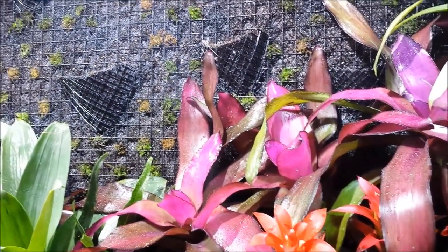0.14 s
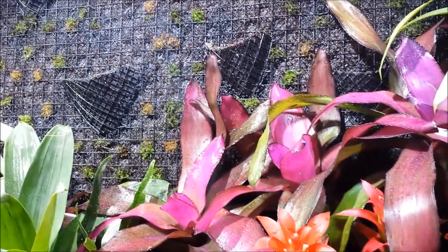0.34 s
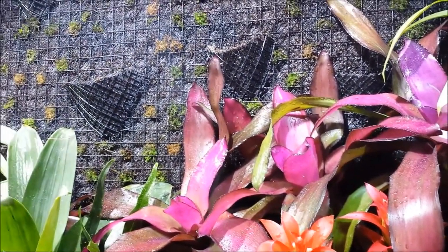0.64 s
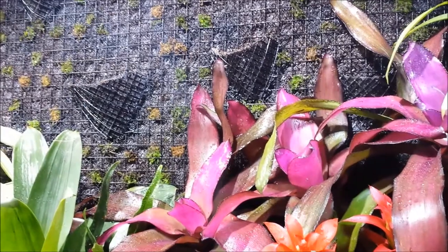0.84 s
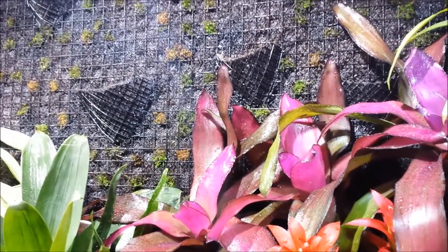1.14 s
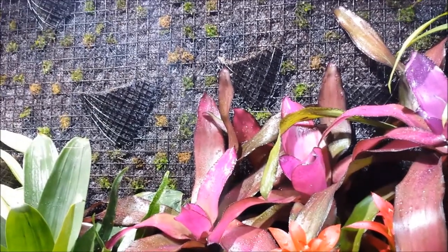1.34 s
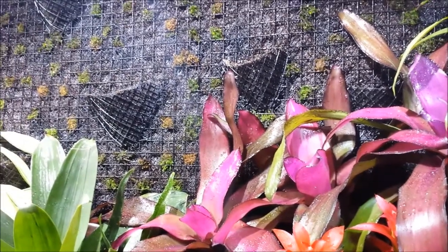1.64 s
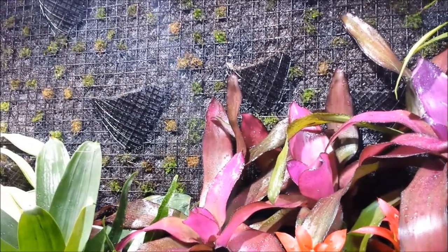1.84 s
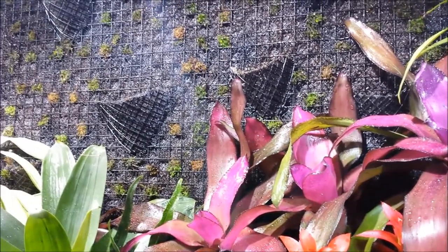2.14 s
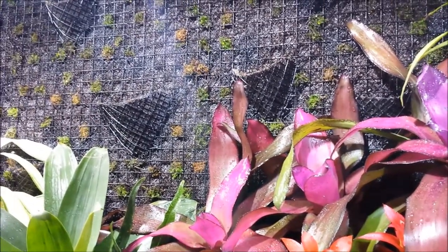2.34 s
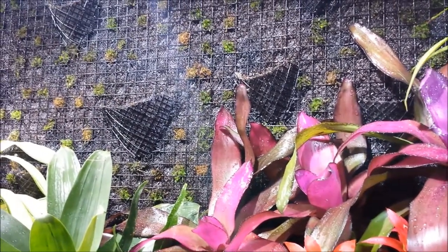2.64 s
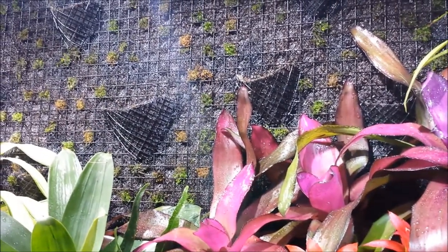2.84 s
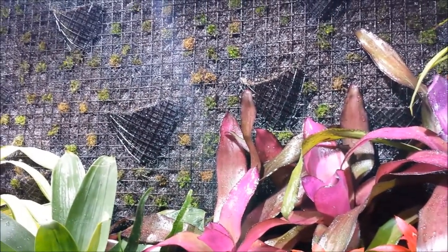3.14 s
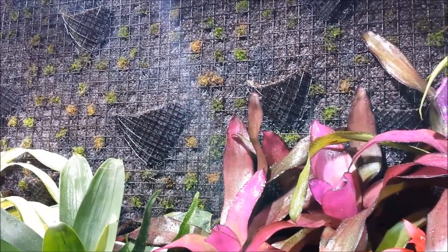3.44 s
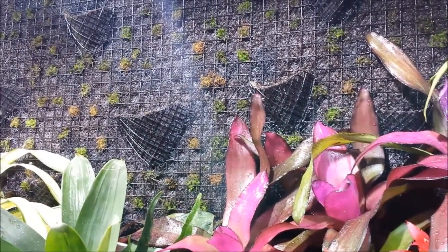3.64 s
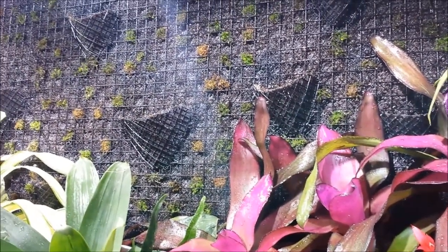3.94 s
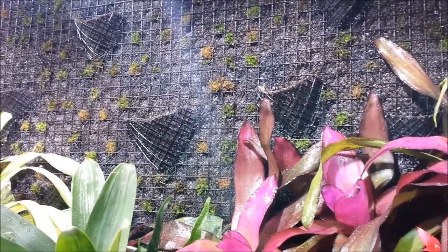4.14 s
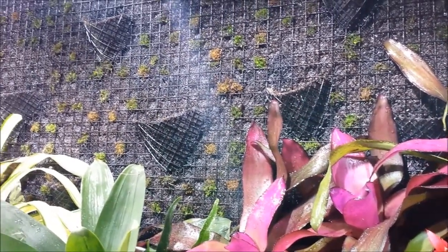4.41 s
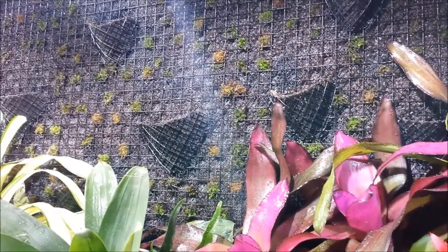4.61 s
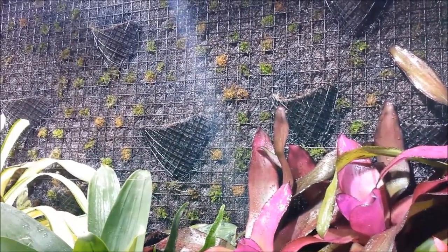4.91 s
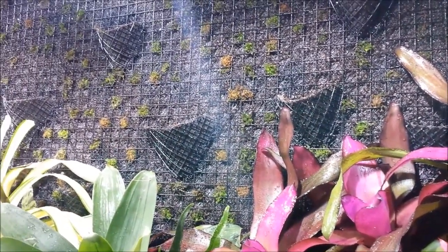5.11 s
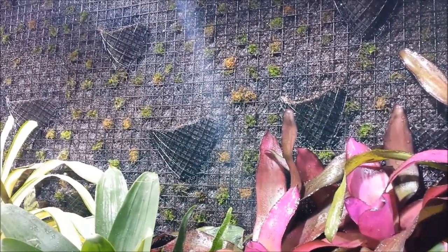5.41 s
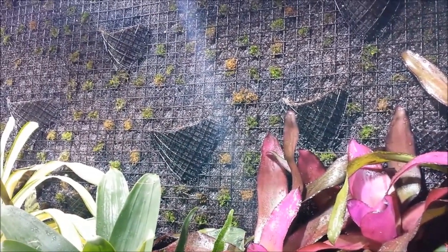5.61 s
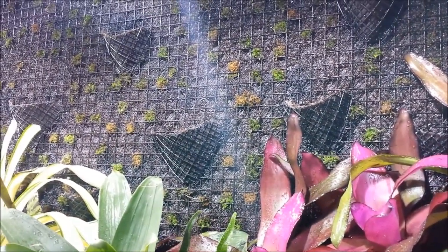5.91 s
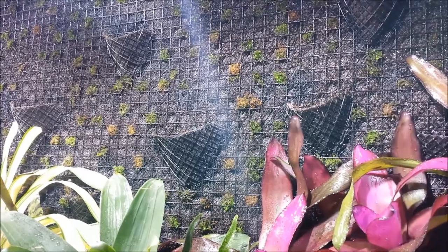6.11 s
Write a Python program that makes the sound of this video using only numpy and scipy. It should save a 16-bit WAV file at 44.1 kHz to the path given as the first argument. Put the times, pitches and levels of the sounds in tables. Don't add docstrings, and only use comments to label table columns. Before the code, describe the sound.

Fine mist nozzles hiss without pause beside an indoor plant wall, bright and airy with little change. Beneath lies a low electrical hum and soft ventilation rumble. A pump throbs quickly, faint at first, fuller in the middle, easing at the end. A very thin high whine sits on top. Handheld stereo pickup, close and wide.

```python
import sys
import numpy as np
from scipy import signal
from scipy.fft import irfft
from scipy.io import wavfile
from scipy.ndimage import uniform_filter1d

SR = 44100
rng = np.random.default_rng(int(sys.argv[2]) if len(sys.argv) > 2 else 0)


def put_to_file(sound):
    columns = np.atleast_2d(sound).T
    safe = np.clip(columns, -1, 1)
    whole_steps = np.round(safe * 32767)
    wavfile.write(sys.argv[1], SR, whole_steps.astype(np.int16))


def volts_from_db(level):
    exponent = np.asarray(level, float) / 20
    return 10 ** exponent


N = 276058
TIME = np.arange(N) / SR


def read(points, hz):
    f, value = np.transpose(points)
    return np.interp(np.log(hz + 1), np.log(f + 1), value)


def follow(points):
    time_s, value = np.transpose(points)
    return np.interp(TIME, time_s, value)


def wander(top_hz, count):
    hz = np.geomspace(.15, top_hz, 12)
    phase = rng.random((count, 12))
    coarse_s = np.arange(0, N + 256, 256) / SR
    sines = np.sin(2 * np.pi * (hz * coarse_s[:, None, None] + phase))
    curves = (sines / np.sqrt(hz)).sum(2).T
    return np.array([np.interp(TIME, coarse_s, c / c.std()) for c in curves])


def noise_pair(shape, same):
    left, other = rng.standard_normal((2, *shape, 2)) @ [1, 1j]
    return left, same * left + np.sqrt(1 - same ** 2) * other


# (frequency [Hz], density [dB per Hz])
RUMBLE_SPECTRUM = [(15, -86), (32, -90), (42, -82), (52, -74), (100, -74.5), (135, -80.5), (200, -78),
                   (280, -80.5), (420, -82.5), (600, -90), (1000, -91.5), (1500, -110)]
# (frequency [Hz], width [Hz], density [dB per Hz])
RESONANCES = [(52, 10, -76), (70, 5.5, -74.5), (80.5, 6.5, -73.5), (92.5, 3.9, -73), (140.8, 8, -72.5),
              (149.7, 10.5, -68.5), (198, 7, -74.5), (252, 9.8, -74.5), (293, 9.2, -76.5),
              (319.7, 9.8, -84), (349, 8.8, -82.5), (380, 3.4, -95), (674, 71, -86), (754, 30, -83),
              (763, 11, -78.5), (788.4, 14.5, -77.5), (808, 16, -76.5), (828, 22, -87), (872, 24, -81.5)]
# (frequency [Hz], likeness [0-1])
RUMBLE_LIKENESS = [(30, .6), (60, 0.93), (250, 0.71), (500, 0.62), (900, 0.47)]


def rumble():
    hz = np.fft.rfftfreq(N, 1 / SR)
    power = volts_from_db(2 * read(RUMBLE_SPECTRUM, hz))
    for centre_hz, width_hz, db in RESONANCES:
        power += volts_from_db(2 * db) / (1 + (2 * (hz - centre_hz) / width_hz) ** 2) ** 2
    same = np.clip(read(RUMBLE_LIKENESS, hz), 0, 1)
    pair = np.array(noise_pair((len(hz),), same))
    return irfft(pair * np.sqrt(power * SR * N / 4), N)


SHAFT_TONE_HZ = [52.37, 55.26, 56.36, 57.98, 59.29, 62.02]
SHAFT_TONE_DB = [-73, -68, -69, -66, -62, -65.5]
# (time [s], level [dB])
PUMP_LOAD = [
    (0, -6),
    (.6, -4),
    (.95, 1.5),
    (1.7, -2),
    (2.5, 3),
    (4.7, 3),
    (5.1, 1),
    (5.8, 1.5),
    (6.26, -5),
]


def shaft(in_step_s=3.918):
    tones = np.cos(2 * np.pi * np.outer(SHAFT_TONE_HZ, TIME - in_step_s))
    return volts_from_db(follow(PUMP_LOAD)) * (volts_from_db(np.array(SHAFT_TONE_DB)) @ tones)


MOTOR_HZ = [18.4, 120, 240, 480.1, 840.2, 115.9, 128.6, 144.1, 148, 183.3, 207, 211.1, 289.9, 293.9, 298,
            764.3]
MOTOR_DB = [-72, -53, -58.5, -79, -75, -69, -71, -64, -65, -63, -65.5, -65, -71, -69, -73, -76]


def motors(waver_db=0.46, waver_cycles=0.049):
    count = len(MOTOR_HZ)
    level, drift = wander(2.2, count), wander(1.65, count)
    cycles = np.outer(MOTOR_HZ, TIME) + waver_cycles * drift + rng.random((count, 1))
    gain = volts_from_db(np.array(MOTOR_DB)[:, None] + waver_db * level)
    tones = (gain * np.sin(2 * np.pi * cycles)).sum(0)
    return np.sqrt(2) * (tones + shaft())


INVERTER_HZ = [10239.4, 11208.4, 10364]
# (left level [dB], right level [dB])
FAINT_DB = [
    (-71.5, -74.5),
    (-84, -70.5),
]
# (direct [dB], echo [dB], echo flat by [Hz], in step at [s])
MAIN_PATHS = [
    (-62, -67.5, .40, 2.43),
    (-58.5, -63.5, .484, 4.14),
]
# (time [s], left gain [dB])
HAND_TURN = [
    (0, -1),
    (.6, 1),
    (1.8, 3),
    (3.2, 1),
    (4.2, -1),
    (6.26, -2),
]


def whine(waver_db=2.5, waver_cycles=0.13):
    cycles = np.outer(INVERTER_HZ, TIME) + waver_cycles * wander(1.38, len(INVERTER_HZ))
    direct_db, echo_db, flat_hz, step_s = np.transpose(MAIN_PATHS)[:, :, None]
    echo = volts_from_db(echo_db) * np.exp(-2j * np.pi * flat_hz * (TIME - step_s))
    main = (volts_from_db(direct_db) + echo) * volts_from_db(np.outer([1, -1], follow(HAND_TURN)))
    fading_db = waver_db * wander(3.5, 4).reshape(2, 2, N)
    faint = volts_from_db(np.array(FAINT_DB)[:, :, None] + fading_db)
    tones = np.concatenate([main[None], faint]) * np.exp(2j * np.pi * cycles[:, None])
    return np.sqrt(2) * tones.sum(0).imag


# (frequency [Hz], density [dB per Hz])
LEFT_HISS = [(560, -86.5), (980, -84.5), (1350, -78), (1900, -76.5), (2700, -83), (3800, -78),
             (5000, -76.5), (5800, -75), (6500, -68.5), (7300, -73.5), (8500, -83.5), (11500, -83.5),
             (13200, -87.5), (14200, -85.5)]
# (frequency [Hz], density [dB per Hz])
RIGHT_HISS = [(560, -87.5), (1000, -87), (1300, -81.5), (2000, -82.5), (3100, -80), (3700, -81.5),
              (4300, -78.5), (5700, -81), (6600, -76), (7500, -71.5), (8500, -75.5), (9600, -80),
              (11800, -81.5), (14300, -81.5)]
# (frequency [Hz], width [Hz], left [dB], right [dB])
PORT_MODES = [(1570, 260, -2, 1), (3600, 250, 0.5, 0), (5740, 320, 0.5, -4), (10300, 440, -3, 2)]
# (frequency [Hz], likeness [-1 to 1])
HISS_LIKENESS = [(500, 0.17), (700, 0.22), (1000, 0.13), (1300, 0.38), (1580, -0.5), (2100, 0.038),
                 (2400, 0.13), (2700, -0.37), (3100, -0.17), (4300, -0.27), (4800, 0.03), (5400, 0.099),
                 (6300, 0.21), (8000, -0.14)]


def nozzles(level_db=-39.5, patchy_db=0.12, flicker_db=0.31):
    frames, hz = N // 256 + 5, np.fft.rfftfreq(1024, 1 / SR)
    same = np.clip(read(HISS_LIKENESS, hz), -1, 1)
    pair = np.stack(noise_pair((frames, 513), same), 2)
    patches = uniform_filter1d(rng.standard_normal((frames, 513, 2)), size=14, axis=0)
    patches = uniform_filter1d(patches, size=16, axis=1)
    flicker = uniform_filter1d(rng.standard_normal((frames, 1, 1)), size=3, axis=0)
    sputter_db = patchy_db * patches / patches.std() + flicker_db * flicker / flicker.std()
    colour_db = np.stack([read(LEFT_HISS, hz), read(RIGHT_HISS, hz)], 1)
    for centre_hz, width_hz, *db in PORT_MODES:
        colour_db += np.outer(np.exp(-(2 * (hz - centre_hz) / width_hz) ** 2), db)
    colour_db -= 60 * np.clip(1 - hz / 520, 0, 1)[:, None]
    spectrum = (pair * volts_from_db(colour_db + sputter_db)).T
    hiss = signal.istft(spectrum, nperseg=1024, noverlap=768)[1][:, :N]
    return volts_from_db(level_db) * hiss / hiss.mean(0).std()


def scene(hum_lean_db=0.5):
    hum = (rumble() + motors()) * volts_from_db(np.array([[hum_lean_db], [-hum_lean_db]]))
    return hum + whine() + nozzles()


def low_pass(x):
    return signal.sosfilt(signal.butter(12, 14580, fs=SR, output="sos"), x)


def record(dry):
    mix = dry - .0004
    return low_pass(mix)


dry = scene()
out = record(dry)
put_to_file(out)
```